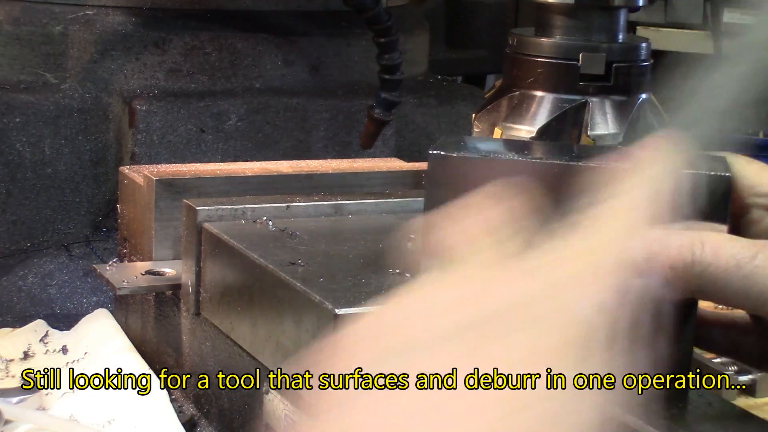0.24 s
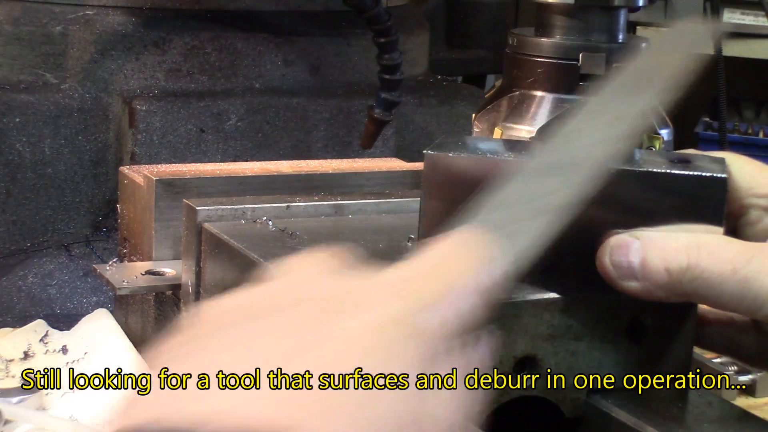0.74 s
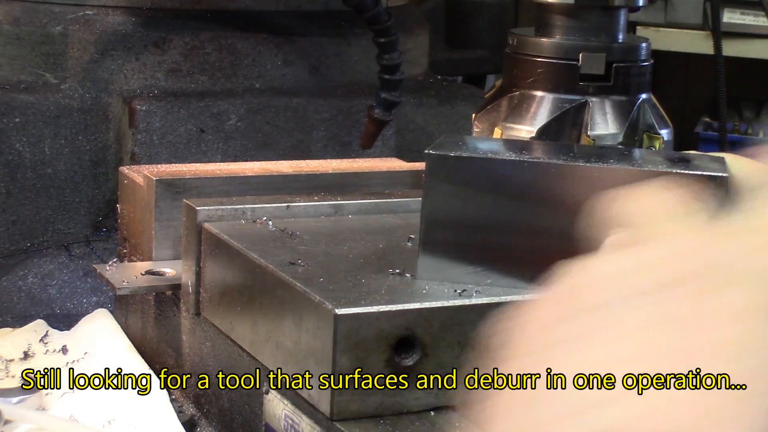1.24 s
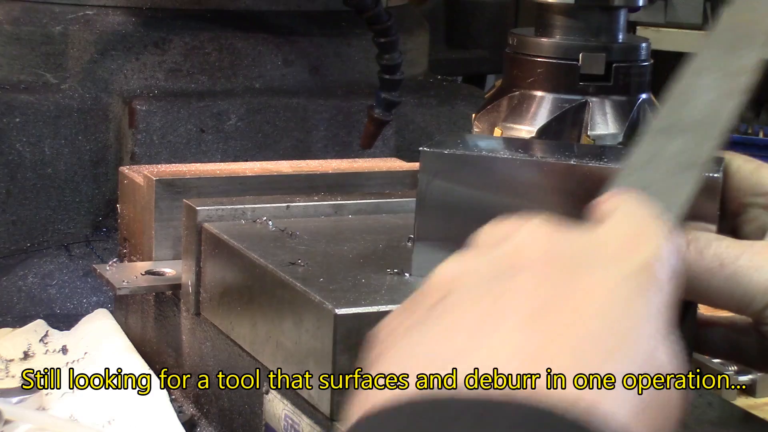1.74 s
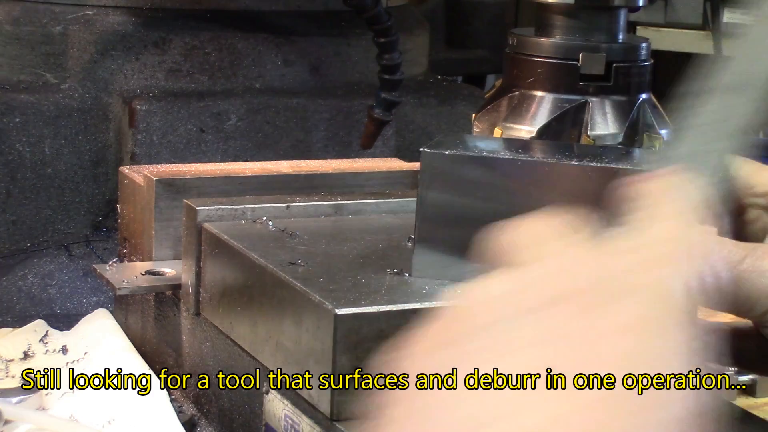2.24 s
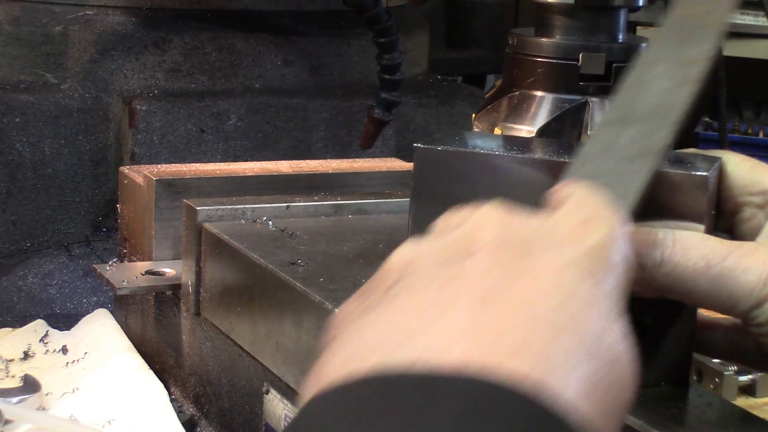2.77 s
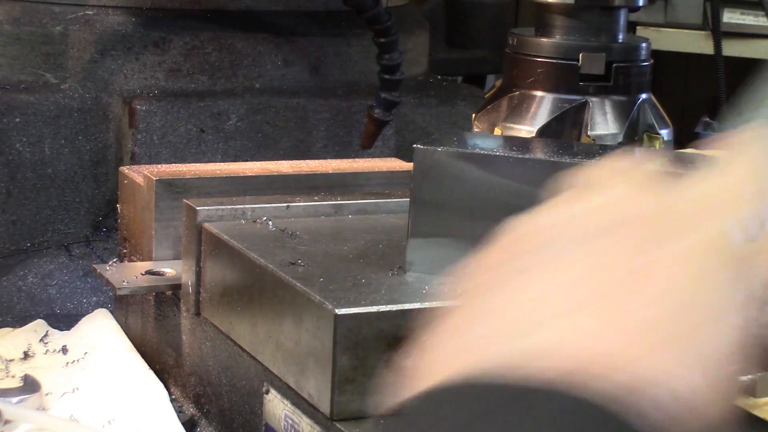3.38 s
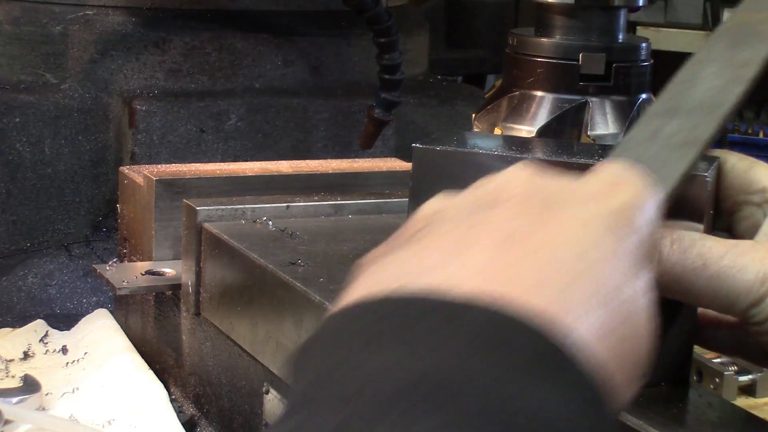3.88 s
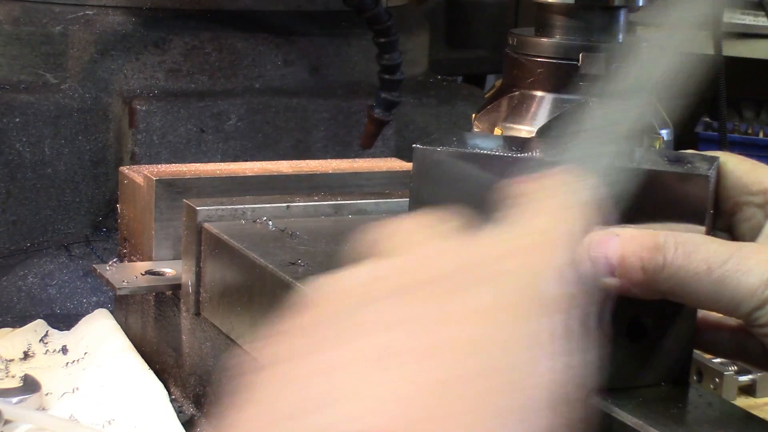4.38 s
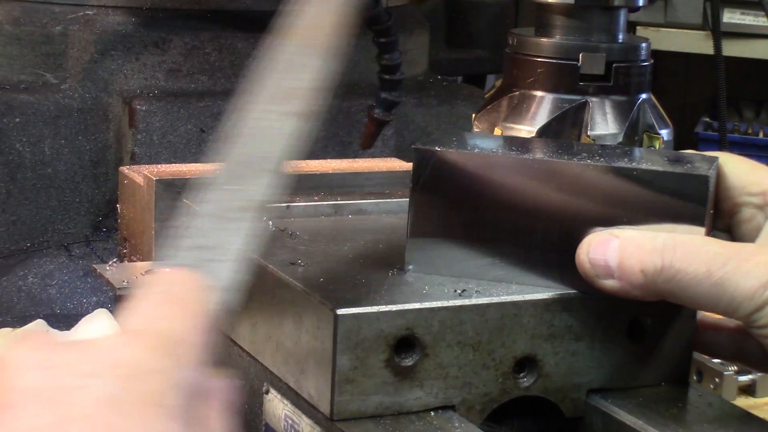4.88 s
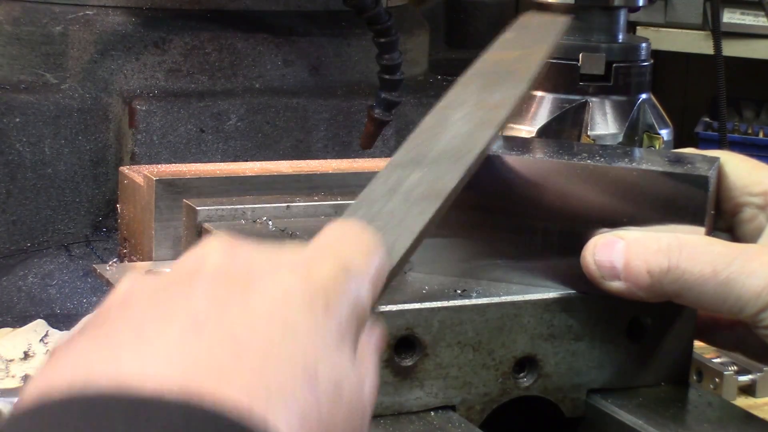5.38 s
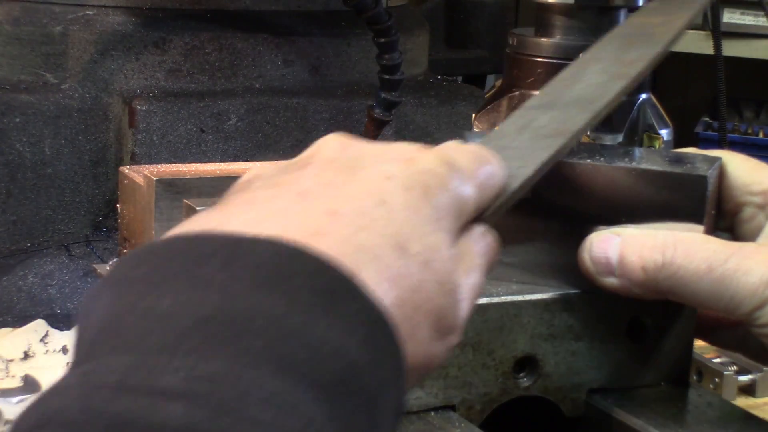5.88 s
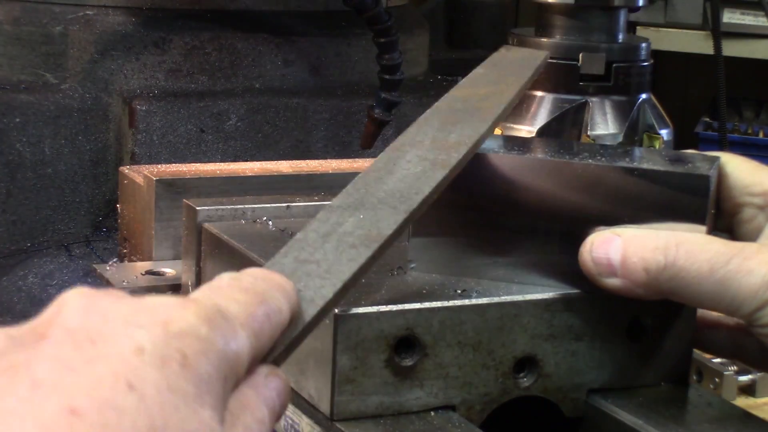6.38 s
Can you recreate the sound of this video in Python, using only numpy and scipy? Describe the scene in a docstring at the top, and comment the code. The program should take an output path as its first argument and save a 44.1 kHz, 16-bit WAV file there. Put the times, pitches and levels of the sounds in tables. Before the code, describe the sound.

In a small workshop, a hand file scrapes the edge of a steel block close to the microphone. It lands with brief metallic clacks, the third the hardest, and pushes on in short, bright rasps that zip and snag. After four bouts of filing comes a pause with a soft, dull bump, then two lighter strokes, another clack and a last scrape. Faint ventilation hiss and electrical hum run underneath.

```python
"""In a small workshop, a flat hand file deburrs the edge of a steel block on a machine vice, close by.
Ventilation hisses and the mains hum. The file lands with a clack, then its teeth rasp, sing and snag on
the edge; each contact excites the modes of file and block, which the hands damp. Something soft bumps
the bench once. The walls add short echoes, and a gain control ducks after the hardest clack."""
import sys
import numpy as np
from scipy import signal
from scipy.fft import rfft, irfft, next_fast_len
from scipy.io import wavfile
from scipy.ndimage import uniform_filter1d, map_coordinates

SR = 44100
rng = np.random.default_rng(int(sys.argv[2]) if len(sys.argv) > 2 else 0)


def int16_out(signal):
    """Quantize to a 16-bit WAV file."""
    q = np.round(np.clip(np.atleast_2d(signal).T, -1, 1) * 32767)
    wavfile.write(sys.argv[1], SR, q.astype(np.int16))


N = 291929
TIME = np.arange(N) / SR


def from_db(db):
    """Decibels to amplitude ratio."""
    return 10 ** (np.asarray(db) / 20)


def rms_one(x):
    """Normalisation to unit power."""
    return x / np.sqrt(np.mean(x ** 2) + 1e-20)


def drift(rate_hz):
    """Random modulation of unit power, interpolated between rate_hz values a second."""
    return rms_one(np.interp(TIME * rate_hz, np.arange(N), rng.standard_normal(N)))


def cut(x, hz, kind, order=4):
    """Butterworth filter."""
    return signal.sosfilt(signal.butter(order, np.clip(hz, 10, .45 * SR), kind, fs=SR, output="sos"), x)


def coloured(x, spectrum):
    """Spectral shaping by a curve of (frequency_hz, gain_db) points."""
    hz, db = np.transpose(spectrum)
    size = next_fast_len(len(x) + SR // 10)
    bins_hz = np.maximum(np.arange(size // 2 + 1) * SR / size, 1)
    gain = from_db(np.interp(np.log(bins_hz), np.log(hz), db))
    return irfft(rfft(x, size) * gain, size)[:len(x)]


def resonate(x, hz, width_hz):
    """A damped oscillator with unit gain at resonance."""
    r = np.exp(-np.pi * width_hz / SR)
    feedback = [1, -2 * r * np.cos(2 * np.pi * hz / SR), r * r]
    return signal.lfilter(np.array([1, 0, -1]) * (1 - r * r) / 2, feedback, x + 1e-18)


def background(air_db=-39, waver_rad=0.51):
    """Broadband ventilation noise lies under the line spectrum of mains hum and faint machine whine."""
    # spectral density of the air noise: frequency_hz, density_db
    air_spectrum = [(12, -35), (20, -3.5), (49, -0.5), (142, -8), (255, -11.5), (328, -13.5), (718, -15),
                    (849, -16.5), (1570, -19.5), (1710, -18), (2670, -21.5), (5380, -23.5), (7310, -26.5),
                    (13200, -28), (16000, -35.5)]
    # hum and whine tones: pitch_hz, rms_db
    tones = [(60, -53), (120, -59.5), (300, -62.5), (1044, -62.5), (1733, -84), (2519, -65.5),
             (5351, -64.5), (5997, -93)]
    air = from_db(air_db) * rms_one(coloured(rng.standard_normal(N), air_spectrum))
    hum = sum(from_db(db) * np.sin(2 * np.pi * hz * TIME + waver_rad * drift(7.2)) for hz, db in tones)
    return air + np.sqrt(2) * hum


def steel(force, broad_db, shifting_db=0):
    """Modal superposition: a contact drives each mode differently, and the balance shifts if it moves."""
    # modes of file and block, damped by the hands: pitch_hz, width_hz, level_db
    modes = [(760, 130, -14), (1540, 150, -3), (2240, 120, -1.5), (2590, 170, -1), (2810, 170, 1.5),
             (3230, 160, -5), (3670, 220, 0), (3920, 130, -4), (4400, 260, -6), (4850, 80, -8),
             (5430, 190, -4), (5770, 120, -8), (5990, 70, -9), (6520, 220, -10), (7030, 170, 1),
             (8500, 180, -8), (8800, 240, 0), (10050, 300, -12), (10450, 220, -10), (10720, 220, -5),
             (12550, 220, -12), (13100, 320, -15), (14500, 200, -15), (14920, 220, -10)]
    # broad radiation between the resonances: frequency_hz, density_db
    scrape_spectrum = [(200, -9), (700, -9), (1100, -10), (1600, -17), (3000, -30), (5000, -10.5),
                       (9000, -5), (12000, -10), (16000, -15)]
    out = from_db(broad_db) * coloured(force * rng.choice([-1, 1], len(force)), scrape_spectrum)
    for hz, width_hz, db in modes:
        coupling_db = shifting_db * drift(14) if shifting_db else 0
        out += resonate(force * rng.choice([-1, 1], len(force)) * from_db(db + coupling_db), hz, width_hz)
    return out


def contact(envelope, treble_db, ring_hz, ring_db):
    """Impact excitation: several teeth chatter in one contact, whose position favours one mode."""
    onset = slice(SR // 200)  # levels refer to the first 5 ms
    crack = 1 + 1.5 * np.exp(-TIME[:len(envelope)] / .0006)
    force = rng.choice([-1, 1], len(envelope)) * crack * envelope
    ringing = cut(steel(force, broad_db=-6.5), 2900, "high", order=3)
    ringing += (from_db(treble_db) - 1) * cut(ringing, 5000, "high", order=1)
    favoured = resonate(force, ring_hz, width_hz=130)
    hit = ringing / np.std(ringing[onset]) + from_db(ring_db) * favoured / np.std(favoured[onset])
    return hit / np.std(hit[onset])


def clacks(skid_db=-17.5, skid_t60_s=.21, knock_db=-8, thud_hz=60, thud_decay_s=0.015):
    """Impacts start damped vibrations: the file lands and skids, the block knocks, the vice thuds."""
    # landings and bounces: start_s, level_db, chatter_t60_s, treble_db, ring_hz, ring_db, thud_db
    landings = [ (0.4119, -33, .008, -3, 3640, -1, -20), (0.415, -28.5, 0.054, 2, 3910, 1, -20),
                (1.3981, -18.5, 0.032, 8, 9070, 4, -16), (2.3718, -22.5, .01, 1, 2580, -1, -26),
                (2.374, -7, 0.03, 2, 6970, 1, -18), (2.3753, -11.5, 0.023, 13, 5420, 0, -26),
                (2.376, -9, 0.022, -1, 8850, 3, -22), (3.5490, -8.5, 0.024, -2, 2400, -9.5, -27.5),
                (3.5675, -14, 0.023, -7, 5660, -7.5, -18), (6.3123, -14, 0.028, -5.5, 2790, -13, -11), ]
    t = TIME[:SR // 5]
    out = np.zeros(N + len(t))
    for start_s, level_db, chatter_t60_s, treble_db, ring_hz, ring_db, thud_db in landings:
        chatter = from_db(-60 * t / chatter_t60_s)
        skid = from_db(skid_db - 60 * t / skid_t60_s)
        hit = contact(chatter + skid, treble_db, ring_hz, ring_db)
        knock = from_db(knock_db) * resonate(rng.choice([-1, 1], len(t)) * chatter, hz=1250, width_hz=600)
        thud = from_db(thud_db) * np.sin(2 * np.pi * thud_hz * t) * np.exp(-t / thud_decay_s)
        out[round(start_s * SR):][:len(t)] += from_db(level_db) * (hit + knock + thud)
    return out[:N]


def reverberation(x, t60_s=0.25, level_db=-20, wall_hz=7000, gap_s=0.0011):
    """Dense reflections from the machine and the walls decay exponentially."""
    t = TIME[:SR // 2]
    envelope = from_db(-60 * t / t60_s) * np.clip(t / gap_s - 1, 0, 1)
    echoes = cut(rng.standard_normal(len(t)), wall_hz, "low", order=2) * envelope
    return from_db(level_db) * signal.fftconvolve(x, echoes / np.linalg.norm(echoes))[:N]


def travelling(x, detune=.011, echo_s=0.000818, echo_swing=0.269, echo_db=-7):
    """Comb filtering: the moving contact varies the delay of the vice's echo and retunes the modes."""
    position = np.arange(N) + np.cumsum(detune * drift(9))
    delay = echo_s * SR * np.exp(echo_swing * drift(5))
    direct = map_coordinates(x, [position], order=3, mode="mirror")
    reflected = map_coordinates(x, [position - delay], order=3, mode="mirror")
    return direct + from_db(echo_db) * reflected


def swell(peak_s, rise_s, hold_s, fall_s, swell_db=20, lift_db=25):
    """Amplitude follows pressure: the hand bears down, holds, lets go and lifts the file."""
    before = np.maximum(peak_s - TIME, 0) / rise_s
    after = np.maximum(TIME - peak_s - hold_s, 0) / fall_s
    lifted = np.maximum(after - 1, 0)
    return from_db(np.maximum(-swell_db * (before + after) - lift_db * lifted, -200))


def rasp(chips_per_s=7000, size_db=2.0, judder_db=1.5, unsteady_db=0.8, body_hz=1950, bite_hz=5000):
    """Shot noise: teeth tear tiny chips off the edge, and these random impulses keep the steel ringing."""
    # pushes of the file: peak_s, rise_s, hold_s, fall_s, level_db, bite_db, body_db
    # level_db sets the middle band; bite (treble) and body (bass) are relative to it
    strokes = [ (0.636, 0.038, 0.072, 0.086, -27, 2, -16.5), (0.754, 0.1, 0.029, .06, -27.5, 6, -10.5),
               (0.786, .04, 0.044, 0.22, -31, 2, -8.5), (0.979, 0.21, .035, 0.041, -39, -1.5, -8),
               (1.69, 0.16, 0.035, .15, -32, 0.5, -7.5), (1.885, 0.11, 0.065, 0.052, -32, -2, -8.5),
               (2.457, .1, 0.089, .1, -46, 2.5, -8), (2.744, 0.16, 0.062, 0.25, -35, 1, -8),
               (3.052, 0.12, 0.036, 0.059, -30, -2, -7.5), (3.62, 0.055, 0.099, .1, -36, -4, -9),
               (3.705, .08, 0.061, .05, -35, 3, -13), (3.77, 0.07, .05, .1, -29.5, 0, -12.5),
               (3.859, .08, 0.1, 0.096, -32.5, 0.5, -7), (3.969, 0.08, 0.037, 0.068, -25, -4, -10),
               (5.295, 0.11, .04, 0.13, -34.5, 1, -9), (5.707, 0.067, 0.052, 0.19, -34.5, 2, -8.5),
               (6.459, 0.028, 0.049, .1, -36, -7, -7.5), (6.51, 0.034, 0.094, 0.13, -33.5, -2, -10.5), ]
    chips = rng.random(N) < chips_per_s / SR
    sizes = from_db(size_db * np.minimum(rng.exponential(1, N), 4))
    hand_pressure = from_db(judder_db * drift(300))
    ringing = travelling(steel(chips * sizes * hand_pressure, broad_db=-7.5, shifting_db=3.0))
    middle = cut(ringing, [body_hz, bite_hz], "band", order=8)
    bite = cut(ringing, bite_hz, "high", order=8)
    body = cut(ringing, body_hz, "low", order=8)
    # each band is held at even power, so that the stroke sets its swell
    bands = [band / np.sqrt(uniform_filter1d(band ** 2, SR // 35) + 1e-12) for band in (middle, bite, body)]
    gains = np.zeros((3, N))
    for peak_s, rise_s, hold_s, fall_s, level_db, bite_db, body_db in strokes:
        peak_gains = from_db(level_db + np.array([[0], [bite_db], [body_db]]))
        gains = np.maximum(gains, peak_gains * swell(peak_s, rise_s, hold_s, fall_s))
    return from_db(unsteady_db * drift(40)) * np.sum(gains * bands, axis=0)


def zips(overtone_db=-15, edge_db=-13):
    """Periodic tooth contact gives a pitch that follows the file's speed, and where the file skates lightly its
    own modes sing at a steady pitch; uneven teeth blur both."""
    # short sung glides: peak_s, length_s, pitch_hz, glide_octaves_per_s, blur_hz, level_db
    glides = [ (0.656, 0.083, 2510, -4.5, 110, -32.5), (0.662, 0.047, 8800, -2, 200, -22),
              (0.675, 0.14, 3870, 1.5, 100, -28.5), (0.75, 0.086, 1534, -1.5, 59.7, -36),
              (0.788, 0.19, 8700, 1, 200, -35), (0.80, 0.093, 3375, -1.5, 200, -34),
              (0.88, 0.15, 3730, 0, 100, -35), (0.835, 0.044, 2654, 0, 80, -30.5),
              (0.88, 0.058, 1270, -2, 50, -43.5), (0.952, 0.053, 1980, 2.5, 60, -39),
              (0.972, .07, 1404, -0.5, 50, -40.5), (1.554, 0.21, 8700, -1, 220, -49),
              (1.651, 0.13, 7270, 0.5, 250, -37.5), (1.656, 0.083, 10850, -.3, 300, -41),
              (1.707, .07, 9100, 1.5, 280, -36), (1.752, 0.031, 10000, 2.5, 280, -36),
              (1.879, 0.14, 3650, 0, 70, -40), (2.529, 0.039, 7500, 2, 300, -40.5),
              (2.662, 0.15, 7330, -.3, 250, -42), (2.694, 0.31, 10600, -.3, 318, -44),
              (2.748, 0.13, 8870, .2, 260, -35.5), (2.785, 0.18, 2440, -.3, 220, -33),
              (3.061, 0.073, 2750, -0.5, 160, -26.5), (3.068, 0.065, 8850, 0, 250, -31),
              (3.651, 0.12, 8830, -0.5, 230, -38.5), (3.728, 0.1, 7440, 0, 350, -35.5),
              (3.797, 0.066, 1813, -5, 60, -35.5), (3.831, .16, 2337, 0.5, 200, -37),
              (3.827, .06, 9750, .5, 280, -36), (3.988, 0.047, 2680, 0, 200, -30),
              (4.008, 0.15, 1470, -1, 60, -41), (5.255, 0.092, 2930, 2, 130, -36.5),
              (5.316, 0.089, 2687, -0.5, 210, -29.5), (5.714, .1, 10800, -.3, 260, -42),
              (5.735, 0.1, 2450, -1.5, 300, -40), (5.74, .1, 1595, 0.5, 70, -43), ]
    t = TIME[:SR] - .5  # one second centred on the peak
    out = np.zeros(N)
    for peak_s, length_s, pitch_hz, glide_octaves_per_s, blur_hz, level_db in glides:
        uneven = cut(rng.standard_normal((2, SR)), blur_hz, "low", order=2)
        uneven /= np.sqrt(uniform_filter1d(np.mean(uneven ** 2, axis=0), SR // 40) + 1e-12)
        phase = 2 * np.pi * np.cumsum(pitch_hz * 2 ** (glide_octaves_per_s * t)) / SR
        fundamental = uneven[0] * np.sin(phase) + uneven[1] * np.cos(phase)
        overtone = from_db(overtone_db) * uneven[0] * np.sin(2 * phase)
        envelope = from_db(level_db + edge_db * np.abs(2 * t / length_s) ** 3)
        out[round((peak_s - .5) * SR):][:SR] += envelope * (fundamental + overtone)
    return out


def snags(t60_s=0.029):
    """Stick and slip: a tooth catches on the burr and breaks free with a gritty tick."""
    # caught teeth: start_s, level_db, ring_hz
    catches = [(0.6911, -15.5, 4020), (0.699, -22, 5500), (0.7414, -19, 3920), (0.7616, -18, 4600),
               (0.7714, -19, 3300), (0.7788, -24, 3270), (3.043, -29, 2800), (3.617, -31, 5500),
               (3.7879, -20, 5530), (4.064, -33.5, 2730), (5.0535, -36, 3870), (5.299, -28, 2870),
               (6.492, -28.5, 3600), (6.5105, -25.5, 2970), (6.522, -29, 5450)]
    t = TIME[:SR // 16]
    out = np.zeros(N + len(t))
    for start_s, level_db, ring_hz in catches:
        tick = contact(from_db(-60 * t / t60_s), treble_db=-5, ring_hz=ring_hz, ring_db=-1.5)
        out[round(start_s * SR):][:len(t)] += from_db(level_db) * tick
    return out[:N]


def bench_bump(t60_s=0.054):
    """A soft impact excites the low, damped modes of the bench."""
    # dull bump: start_s, level_db
    bumps = [(4.681, -36.5)]
    # bench modes: pitch_hz, width_hz, level_db
    modes = [(444, 90, -4), (814, 37, 10), (1240, 63, -9), (1700, 200, -25)]
    out = np.zeros(N)
    for start_s, level_db in bumps:
        envelope = (TIME >= start_s) * from_db(-60 * np.abs(TIME - start_s) / t60_s)
        force = rng.standard_normal(N) * envelope
        bump = sum(from_db(db) * resonate(force, hz, width_hz) for hz, width_hz, db in modes)
        out += from_db(level_db) * bump / np.std(bump[round(start_s * SR):][:SR // 60])
    return out


def scene(haze_side_db=-28):
    """Mid-side stereo, nearly mono: the hiss has slight width and a faint haze follows the filing."""
    # slight stereo width of the background hiss, side relative to middle: frequency_hz, side_db
    width_spectrum = [(30, -38), (120, -29), (350, -21), (800, -23.5), (2000, -29), (8000, -18.5),
                      (15000, -19)]
    filing = rasp() + zips() + clacks() + snags() + bench_bump()
    hiss_side = coloured(background(), width_spectrum)
    haze_side = from_db(haze_side_db) * reverberation(filing)
    middle = filing + reverberation(filing) + background()
    return middle + (hiss_side + haze_side) * np.array([[1], [-1]])


def record(dry, threshold_db=-8, release_db_per_s=4.0, attack_s=0.014, ceiling=.95, cutoff_hz=15650):
    """Automatic gain control: the hardest clack saturates before the gain drops, then slowly recovers."""
    level_db = 10 * np.log10(np.maximum(uniform_filter1d(dry[0] ** 2, SR // 250), 1e-12))
    excess_db = np.maximum(level_db - threshold_db, 0)
    recovery_db = release_db_per_s * TIME
    duck_db = np.maximum.accumulate(excess_db + recovery_db) - recovery_db
    lag = np.exp(-1 / (attack_s * SR))
    ducked = dry * from_db(-signal.lfilter([1 - lag], [1, -lag], duck_db))
    saturated = ceiling * np.tanh(ducked / ceiling)
    low_pass = signal.ellip(10, .2, 80, cutoff_hz, fs=SR, output="sos")
    return signal.sosfilt(low_pass, saturated)


dry = scene()
out = record(dry)
int16_out(out)
```